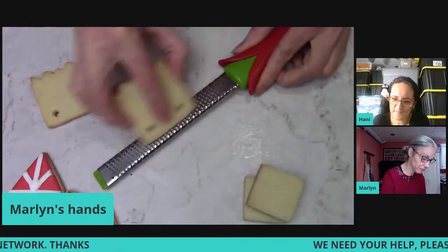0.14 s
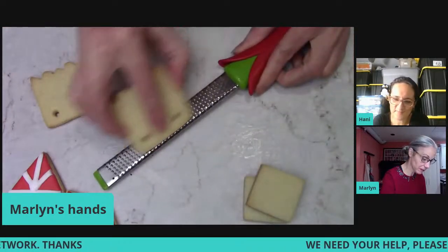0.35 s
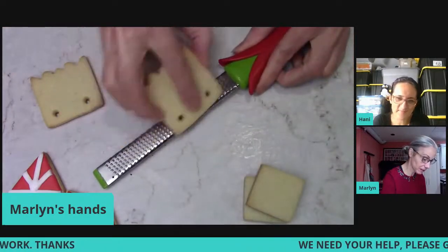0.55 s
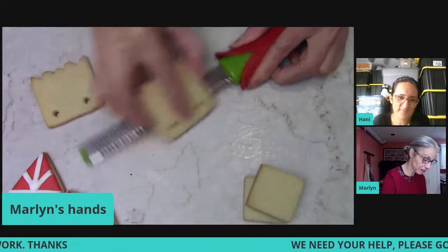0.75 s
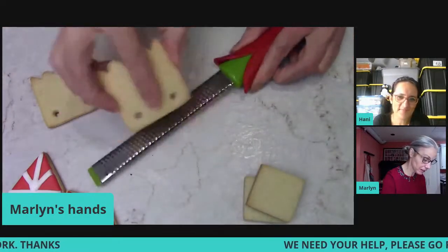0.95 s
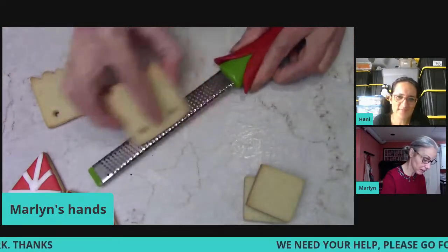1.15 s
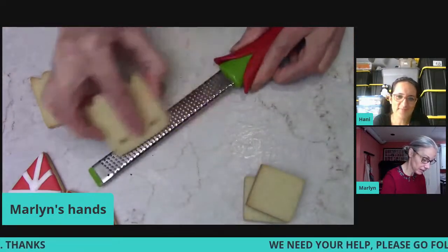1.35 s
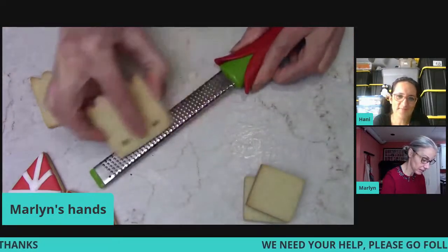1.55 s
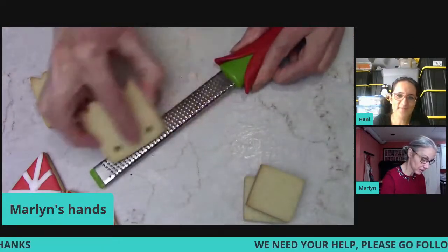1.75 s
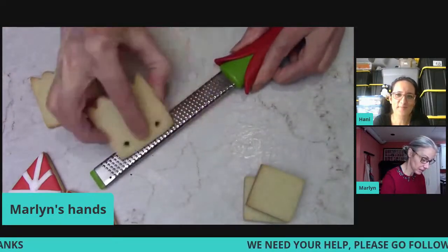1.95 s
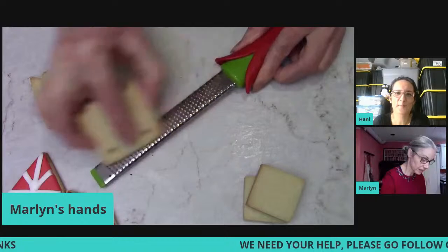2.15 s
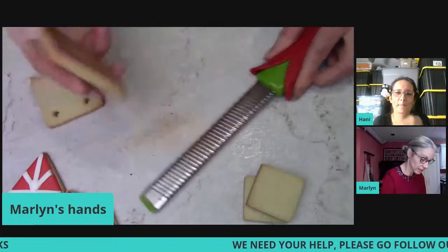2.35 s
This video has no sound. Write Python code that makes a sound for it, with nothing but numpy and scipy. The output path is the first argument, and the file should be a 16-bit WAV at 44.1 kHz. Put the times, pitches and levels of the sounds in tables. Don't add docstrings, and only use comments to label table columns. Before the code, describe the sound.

A dry biscuit edge is rasped on a toothed steel blade, quick alternating strokes from 0 to 0.66 seconds, hollow and gritty, with a soft counter thump near 0.52. Near silence follows until the biscuit lands dully at 0.95. Steady, brighter strokes with crumbly hiss, about ten per second, run from 1.0 to 2.15, then stop into quiet. Small room, close call microphone with noise suppression.

```python
import sys
import numpy as np
from scipy import signal
from scipy.fft import rfft, irfft, next_fast_len
from scipy.io import wavfile
from scipy.ndimage import uniform_filter1d, minimum_filter1d, map_coordinates

SR = 44100
rng = np.random.default_rng(int(sys.argv[2]) if len(sys.argv) > 2 else 0)


def volts_from_db(level):
    exponent = np.asarray(level, float) / 20
    return 10 ** exponent


def put_to_file(sound):
    columns = np.atleast_2d(sound).T
    safe = np.clip(columns, -1, 1)
    whole_steps = np.round(safe * 32767)
    wavfile.write(sys.argv[1], SR, whole_steps.astype(np.int16))


N = 109985
TIME = np.arange(N) / SR

# start in seconds, length in seconds, level in dB,
# crumb hiss in dB against the scrape, biscuit resonance in Hz.
STROKES = [(-.06, 0.092, -19, -2.5, 993.7), (.048, 0.1, -21, 1, 840), (.155, 0.12, -16, -0.5, 680),
           (.275, 0.098, -15, 2.5, 900), (.404, 0.073, -17, 6.5, 800), (.485, 0.066, -14, -4, 820),
           (.54, 0.03, -9.5, -10, 600), (.588, 0.071, -15, -2.5, 469), (.988, 0.13, -21, 7, 990),
           (1.112, 0.096, -15.5, 2.5, 680), (1.215, 0.11, -18.5, 9.5, 990), (1.325, 0.1, -15, 5.5, 680),
           (1.425, .1, -19.5, 10.5, 990), (1.535, 0.087, -15.5, 6, 680), (1.635, 0.098, -19, 11, 990),
           (1.742, 0.1, -14.5, 5.5, 682), (1.853, 0.09329, -16.5, 10, 990), (1.955, 0.094, -14, 3, 680),
           (2.058, 0.092, -17.5, 11, 726), (2.108, .04, -17.5, -17, 544)]
# frequency in Hz, width in Hz, level in dB.
BLADE_MODES = [(537, 40, -3.5), (613, 110, 4.5), (704, 15, -3), (907, 63, -4.5), (990, 72, -2),
               (1191, 11, -3), (1318, 40, 2.5), (1296, 45, -13)]
# frequency in Hz, width in Hz, level in dB.
UPPER_MODES = [(1750, 140, -8.5), (1991.8, 80, -10.5), (2604, 85, -7.5), (3535.1, 71, -14),
               (4190, 74, -12.5), (5680, 96, -16.5), (7130, 100, -17.5)]
# frequency in Hz, level in dB.
SCRAPE_COLOUR = [(110, -91), (250, -37), (400, -19), (600, -4.5), (1000, -0.5), (1450, -2.5), (2300, -25)]
# frequency in Hz, level in dB.
HISS_COLOUR = [(800, -58.5), (1900, -9.5), (2900, -20), (5000, -17), (7200, -18), (10500, -26),
               (13500, -25.5), (15800, -25.5)]
# frequency in Hz, width in Hz, level in dB.
COUNTER_MODES = [(40, 23, -17), (150, 18, 0), (240, 45, 4), (390, 84, 4)]
# time in seconds, level in dB.
GRIP = [(0, 0.5), (.1, -25.5), (.3, 0), (.52, 6.5), (0.682, -11.5), (1.001, 6.5), (1.198, 4), (1.35, 0.5),
        (1.47, 8), (1.602, -17.5), (1.68, 2.5), (1.799, -17), (1.879, 4.5), (2.048, -9), (2.13, -11)]
# frequency in Hz, width in Hz, half its level in dB.
LANDING_MODES = [(300, 180, 0.5), (1453, 410, -3.5), (2650, 130, -13.5), (3460, 200, -15.5),
                 (5500, 1800, -14.5)]
# start in seconds, level in dB, pitch in Hz, decay in cycles squared.
KNOCKS = [
    (0.396, -51, 45, .9),
    (.518, -31, 45, .9),
    (0.524, -27, 120.6, 1),
    (0.529, -39, 220, 1.5),
    (2.315, -69.5, 145, 8),
]
# frequency in Hz, time to fall 60 dB in seconds.
ROOM_DECAY = [(150, .2), (600, .22), (1200, 0.27512), (4000, 0.2), (12000, 0.05)]
# frequency in Hz, threshold in dB.
GATE_THRESHOLD = [(150, -98.5), (500, -60), (1000, -70), (1700, -77), (2500, -69), (5000, -75.5),
                  (12000, -80.5)]
# time in seconds, lift in dB.
GATE_LIFT = [(.62, -11), (.7, 2.5), (.76, 16), (.8, 31), (.85, 0), (2.19, -12), (2.24, 6), (2.3, -1)]
# frequency in Hz, level in dB.
FLOOR_COLOUR = [(18, -49), (30, -19), (140, -4), (202, -8), (243, 1), (284, -10), (324, -5), (1970, -21),
                (15600, -28)]

SCRAPE_LEAN, HISS_LEAN, ROUNDNESS = 0.69, 0.88, 0.8628
HISS_GROWTH = 1.4
GRAINS_PER_S, GRAIN_SPREAD_DB, CLUMP_DB, CLUMPS_PER_S = 5000, 3.5, -1, 78
FINE_DUST, HISS_PATCH_DB, SCRAPE_PATCH_DB = 0.6, 1.8, 1.5
BISCUIT_WIDTH_HZ, BISCUIT_DB = 220, 4
CONTACT_DB = 2.2
LIFTED_FROM_S, LIFTED_TO_S, LIFTED_DB = 0.78, 0.7, -17
HANDLE_HZ, HANDLE_WIDTH_HZ, HANDLE_DB = 490, 55, 0
LOOSE_FROM_S, LOOSE_TO_S, FIRM_DB = 0.25, 0.7, -20
COUNTER_DB, PUSH_DB, COUNTER_SWING_DB = -24, 3, 2
TURN_HZ, TURN_FROM_S, TURN_TO_S, TURN_DB = 8000, 0.4, 0.72, -10.5
LANDING_S, LANDING_LENGTH_S, LANDING_DB = 0.948, 0.05, -33.5
ROOM_DB, FLOOR_DB = -10.5, -80
GATE_STEEPNESS, GATE_S, REOPEN_S = 1.6, 0.02, 0.948
LIMIT, TOP_HZ, EDGE_HZ = 0.85, 15900, 300


def rasp():
    scrape_drive, hiss_drive, push_drive = strokes()
    scrape = filtered(scrape_drive * crumbs(), lambda f: volts_from_db(along(SCRAPE_COLOUR, f)))
    near = patchy(ringing() + scrape, SCRAPE_PATCH_DB) + crumb_hiss(hiss_drive)
    return volts_from_db(11.5) * near + volts_from_db(24) * counter(push_drive)


def strokes():
    scrape, hiss, push = np.zeros(N), np.zeros(N), np.zeros(N)
    for k, (start, length, db, hiss_db, _) in enumerate(STROKES):
        v = speed(start, length, SCRAPE_LEAN)
        scrape += volts_from_db(db) * v
        hiss += volts_from_db(db + hiss_db) * speed(start, length, HISS_LEAN) ** HISS_GROWTH
        push += volts_from_db(db + PUSH_DB * (-1) ** k) * v
    return scrape, hiss, push


def speed(start, length, lean):
    u = np.clip((TIME - start) / length, 0, 1)
    return np.abs(np.sin(np.pi * u ** lean)) ** ROUNDNESS


def crumbs():
    hit = rng.random(N) < GRAINS_PER_S / SR
    size = volts_from_db(GRAIN_SPREAD_DB * rng.standard_normal(N))
    sign = np.sign(rng.standard_normal(N))
    return unit(hit * size * sign * volts_from_db(CLUMP_DB * wobble(CLUMPS_PER_S)))


def ringing():
    ring, grains = np.zeros(N), crumbs()
    contact_db = CONTACT_DB * rng.standard_normal((len(STROKES), len(BLADE_MODES + UPPER_MODES)))
    for k, (start, length, db, hiss_db, biscuit_hz) in enumerate(STROKES):
        damped_db = LIFTED_DB * (LIFTED_FROM_S < start < LIFTED_TO_S)
        firm_db = FIRM_DB * (not LOOSE_FROM_S < start < LOOSE_TO_S)
        steel = BLADE_MODES + [(hz, width, level + hiss_db + damped_db) for hz, width, level in UPPER_MODES]
        blade = modes([(hz, width, level + d) for (hz, width, level), d in zip(steel, contact_db[k])])
        handle = modes([(HANDLE_HZ, HANDLE_WIDTH_HZ, HANDLE_DB + firm_db)])
        biscuit = modes([(biscuit_hz, BISCUIT_WIDTH_HZ, BISCUIT_DB)])

        def response(f):
            low_cut = f ** 4 / (f ** 4 + 300 ** 4)
            return (blade(f) - handle(f)) * low_cut + biscuit(f) ** 2

        span = slice(max(round(start * SR), 0), round((start + length) * SR) + SR // 20)
        strike = volts_from_db(db) * speed(start, length, SCRAPE_LEAN) * grains
        ring[span] += filtered(strike[span], response)
    return ring


def crumb_hiss(drive):
    dust = unit(crumbs() + FINE_DUST * 2 * rng.standard_normal(N))
    hiss = filtered(drive * patchy(dust, HISS_PATCH_DB), lambda f: volts_from_db(along(HISS_COLOUR, f)))
    finest = filtered(hiss, lambda f: 1 / (1 + (TURN_HZ / (f + 1)) ** 4))
    turn_times = [TURN_FROM_S - 0.01, TURN_FROM_S, TURN_TO_S, TURN_TO_S + 0.01]
    turned = np.interp(TIME, turn_times, [0, 1, 1, 0])
    return hiss - turned * (1 - volts_from_db(TURN_DB)) * finest


def counter(push):
    grip_db = np.interp(TIME, *np.transpose(GRIP)) + COUNTER_SWING_DB * wobble(12)
    drive = push * volts_from_db(COUNTER_DB + grip_db) * crumbs()
    return filtered(drive, lambda f: modes(COUNTER_MODES)(f) / (1 + (f / 450) ** 4))


def landing():
    t = TIME - LANDING_S
    shape = np.clip(t / 0.00089, 0, 1) * np.clip((LANDING_LENGTH_S - t) / 0.015, 0, 1)
    slide = filtered(rng.standard_normal(N), lambda f: modes(LANDING_MODES)(f) ** 2 / (1 + (f / 6500) ** 6))
    return volts_from_db(LANDING_DB) * shape * unit(slide)


def knocks():
    total = np.zeros(N)
    for start, db, hz, decay in KNOCKS:
        cycle = np.clip((TIME - start) * hz, 0, None)
        swell = cycle * np.exp(-cycle ** 2 / decay) * 3 / np.sqrt(decay)
        total += volts_from_db(db) * np.sin(2 * np.pi * cycle) * swell
    return total


def room(x):
    hz, t, z = signal.stft(rng.standard_normal(SR // 2), SR, nperseg=256)
    decay = volts_from_db(-60 * t / along(ROOM_DECAY, hz)[:, None])
    tail = signal.istft(z * decay, SR, nperseg=256)[1]
    late = np.pad(x, (200, 0))
    return signal.fftconvolve(late, tail / np.linalg.norm(tail))[:N]


def noise_suppression(x):
    hz, t, z = signal.stft(x, SR, nperseg=512, noverlap=448)
    power = uniform_filter1d(np.abs(z) ** 2, size=3, axis=0)
    power = np.abs(uniform_filter1d(power, size=max(round(GATE_S * SR / 64), 1), axis=1))
    threshold_db = along(GATE_THRESHOLD, hz)[:, None] + np.interp(t, *np.transpose(GATE_LIFT))
    gain = (power / (power + volts_from_db(threshold_db) ** 2)) ** GATE_STEEPNESS
    clean = signal.istft(z * gain, SR, nperseg=512, noverlap=448)[1][:N]
    shut_centre = REOPEN_S - 0.05
    return clean * np.clip(np.abs(TIME - shut_centre) / 0.001 - 50, 0, 1)


def limited(x):
    need = minimum_filter1d(np.minimum(1, LIMIT / (np.abs(x) + 1e-9)), size=201)
    return x * uniform_filter1d(need, size=101)


def microphone_floor():
    noise = filtered(rng.standard_normal(N), lambda f: volts_from_db(along(FLOOR_COLOUR, f)))
    return volts_from_db(FLOOR_DB + 2.5 * wobble(25)) * unit(noise)


def unit(x):
    return x / np.sqrt(np.mean(x ** 2) + 1e-20)


def along(points, hz):
    f, v = np.transpose(points)
    return np.interp(np.log(hz + 1), np.log(f + 1), v)


def wobble(rate):
    return map_coordinates(rng.standard_normal(int(N * rate / SR) + 4), [np.arange(N) * rate / SR])


def filtered(x, response):
    m = next_fast_len(len(x) + SR // 2)
    return irfft(rfft(x, m) * response(np.fft.rfftfreq(m, 1 / SR)), m)[:len(x)]


def modes(table):
    def response(f):
        total = 0
        for k, (hz, width, db) in enumerate(table):
            damping = 1j * f * width
            total = total + (-1) ** k * volts_from_db(db) * damping / (hz * hz - f * f + damping)
        return total
    return response


def patchy(x, depth_db):
    z = signal.stft(x, nperseg=256)[2]
    field = uniform_filter1d(rng.standard_normal(z.shape), size=5, axis=0)
    field = uniform_filter1d(field, size=14, axis=1)
    return signal.istft(z * volts_from_db(depth_db * unit(field)), nperseg=256)[1][:N]


def scene():
    near = rasp() + landing()
    return (near + volts_from_db(ROOM_DB) * room(near) + knocks())[None]


def low_pass(x):
    return signal.sosfilt(signal.butter(12, 15710, fs=SR, output="sos"), x)


def record(dry):
    voice = limited(noise_suppression(dry[0]))
    mix = filtered(voice + microphone_floor(), lambda f: np.clip((TOP_HZ - f) / EDGE_HZ, 0, 1))
    return low_pass(mix[None])


dry = scene()
out = record(dry)
put_to_file(out)
```